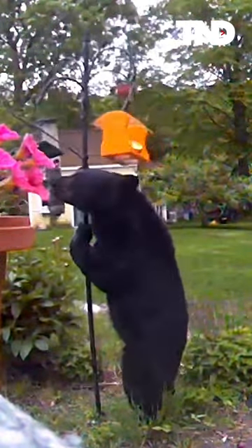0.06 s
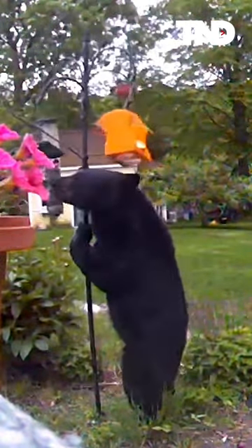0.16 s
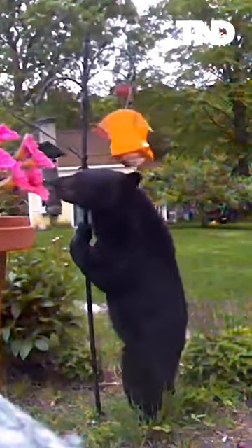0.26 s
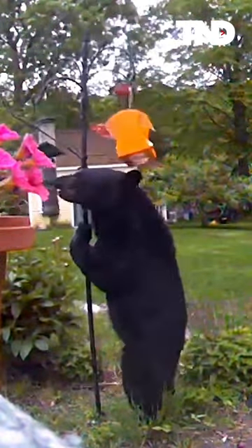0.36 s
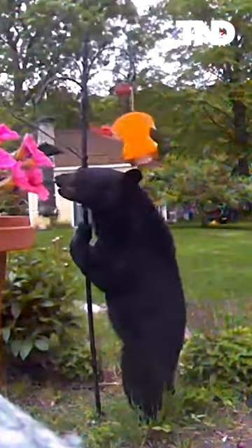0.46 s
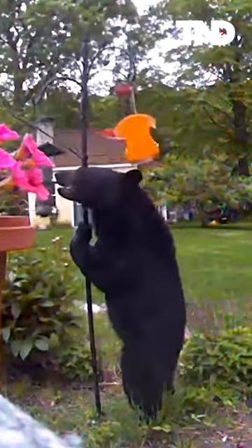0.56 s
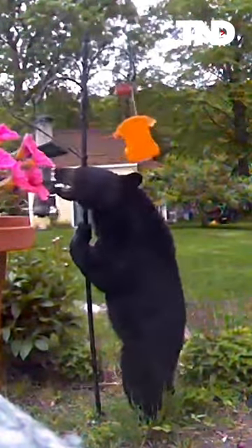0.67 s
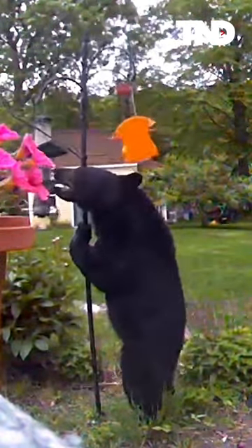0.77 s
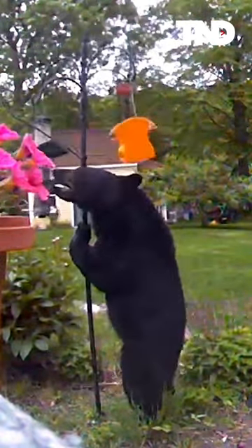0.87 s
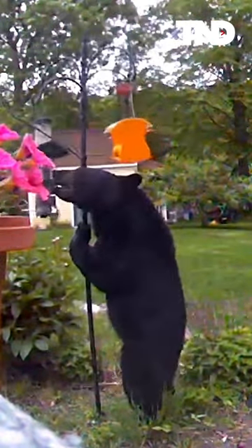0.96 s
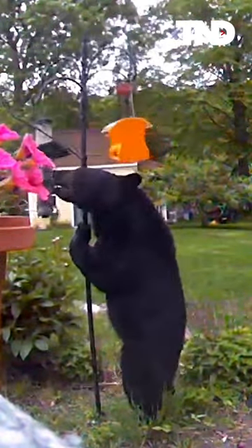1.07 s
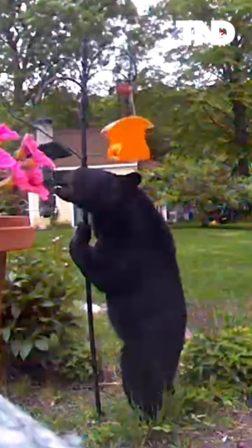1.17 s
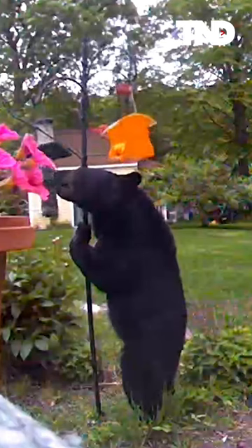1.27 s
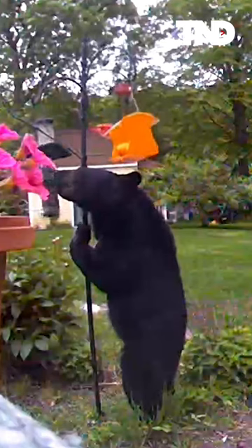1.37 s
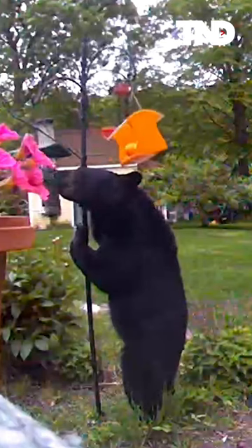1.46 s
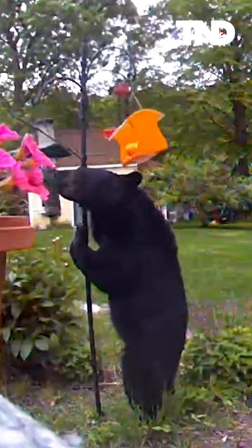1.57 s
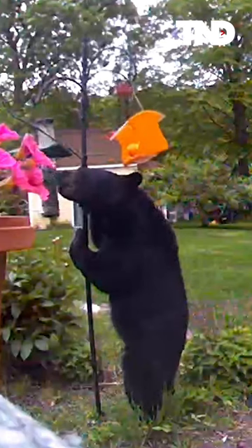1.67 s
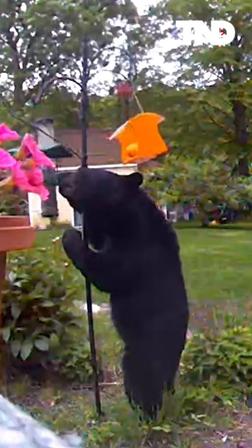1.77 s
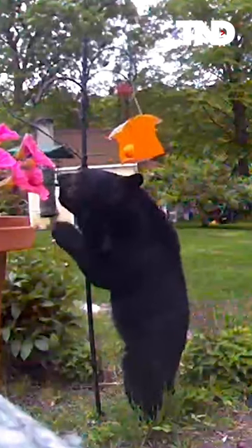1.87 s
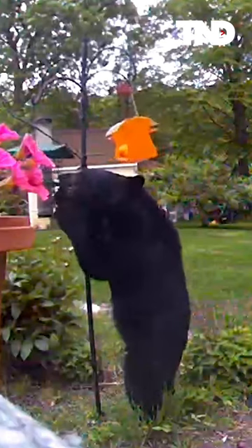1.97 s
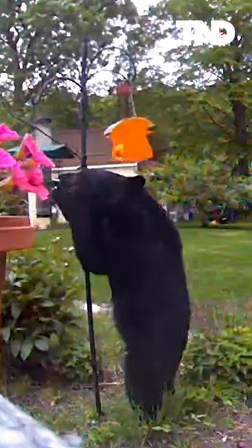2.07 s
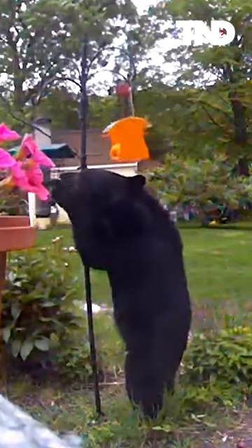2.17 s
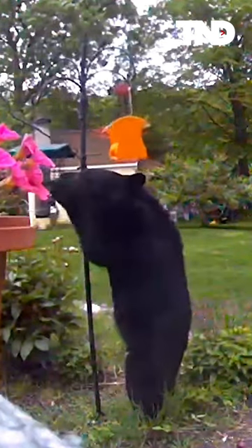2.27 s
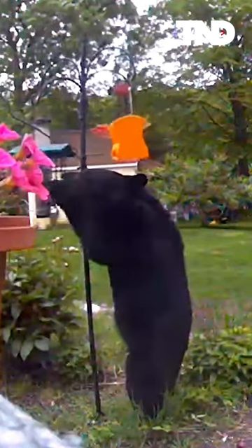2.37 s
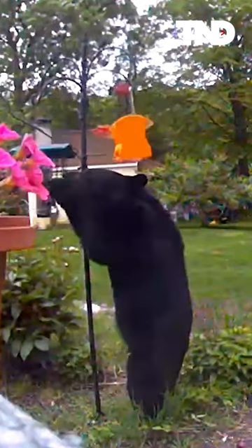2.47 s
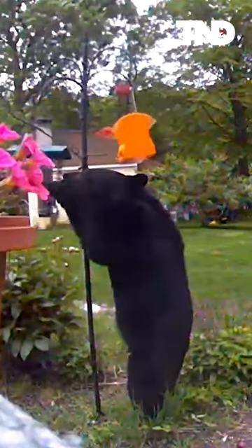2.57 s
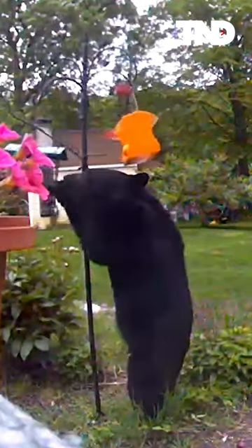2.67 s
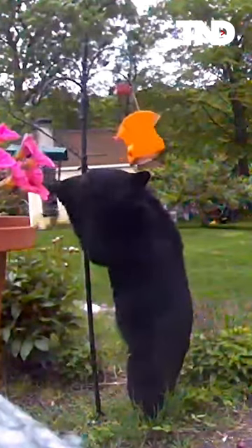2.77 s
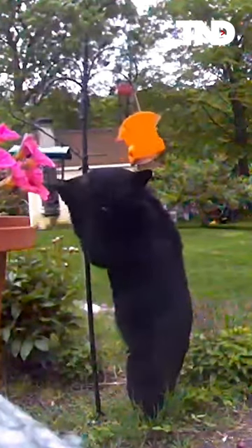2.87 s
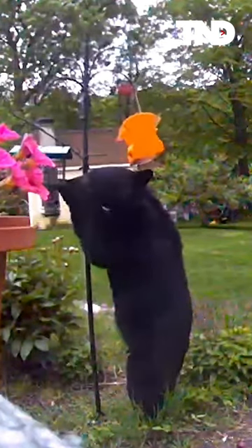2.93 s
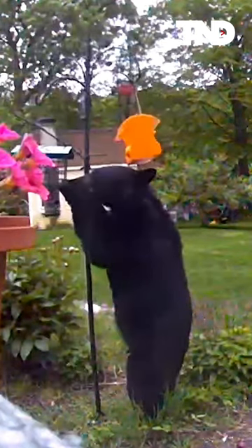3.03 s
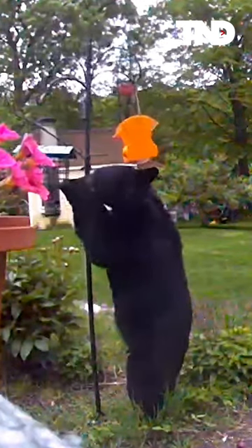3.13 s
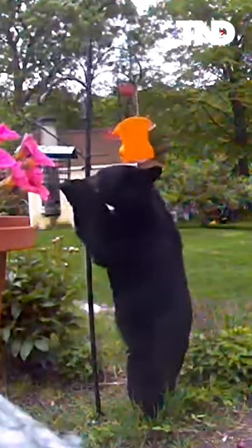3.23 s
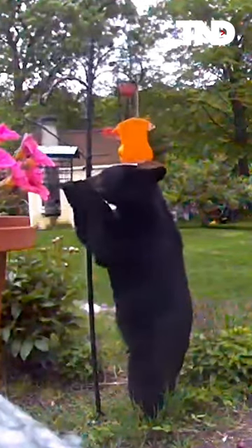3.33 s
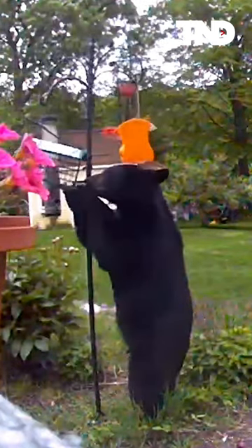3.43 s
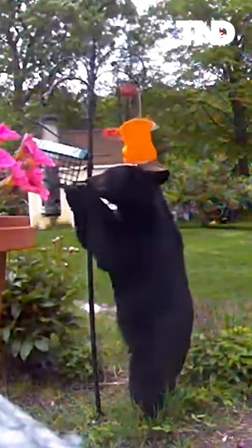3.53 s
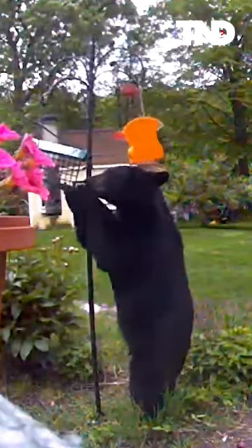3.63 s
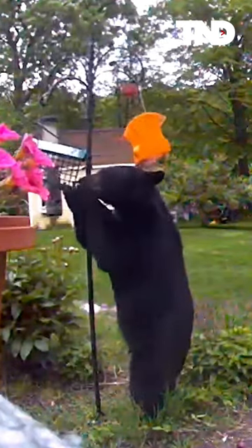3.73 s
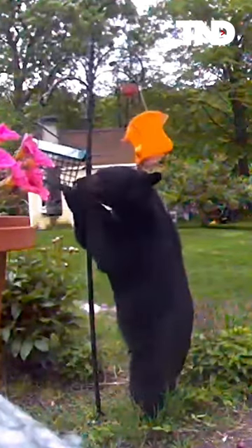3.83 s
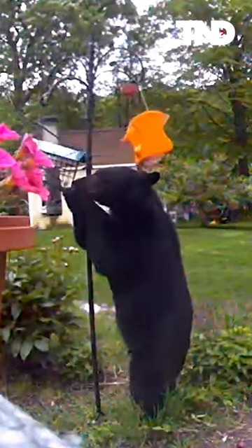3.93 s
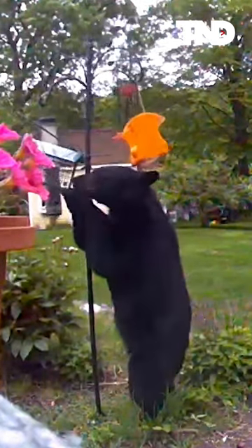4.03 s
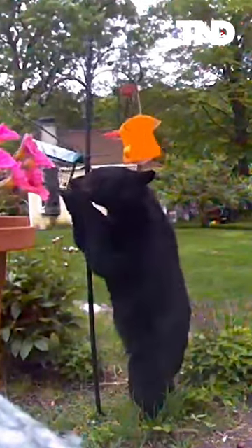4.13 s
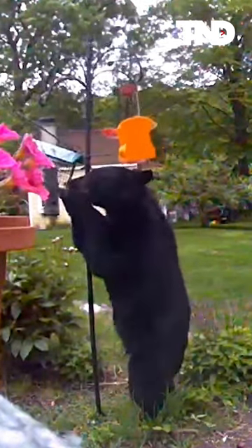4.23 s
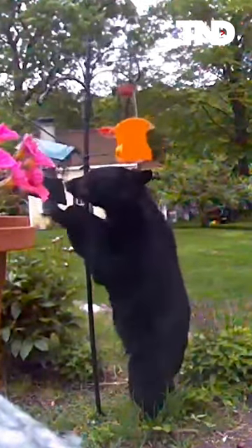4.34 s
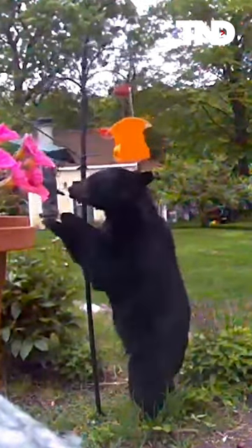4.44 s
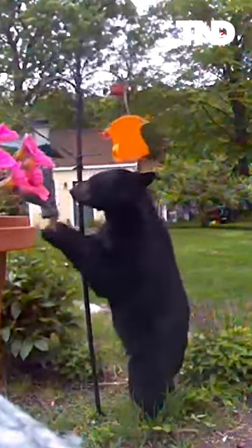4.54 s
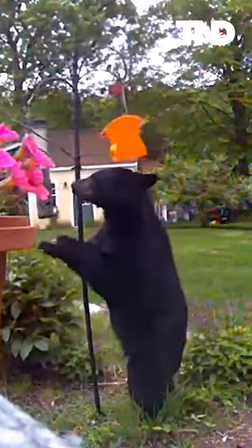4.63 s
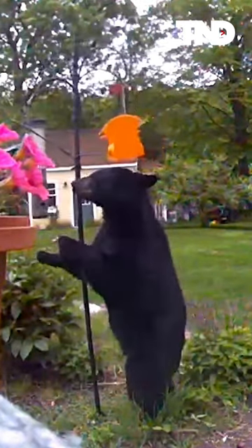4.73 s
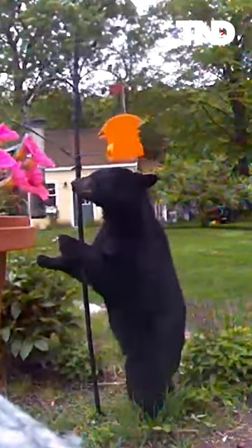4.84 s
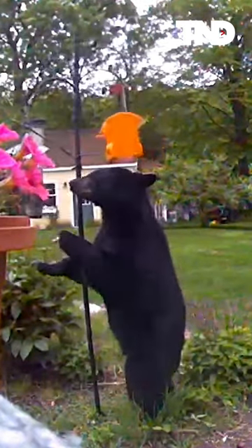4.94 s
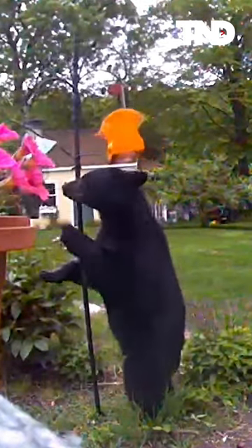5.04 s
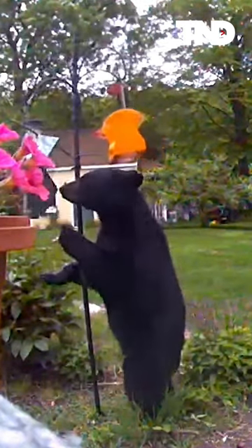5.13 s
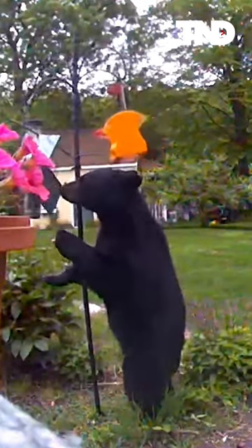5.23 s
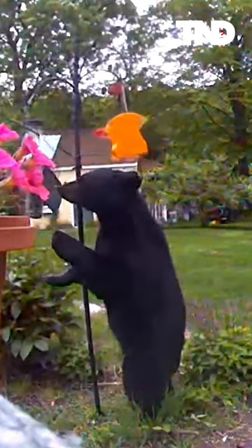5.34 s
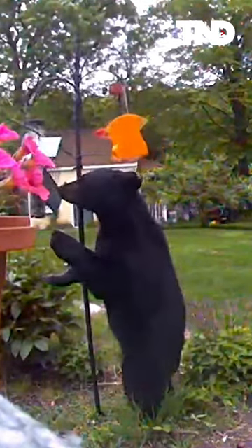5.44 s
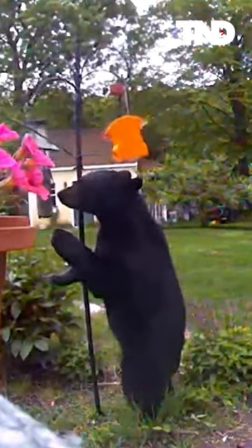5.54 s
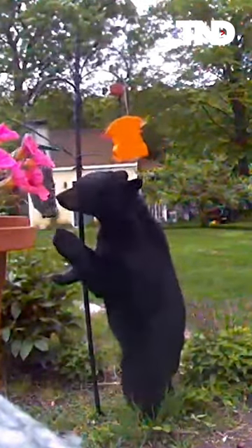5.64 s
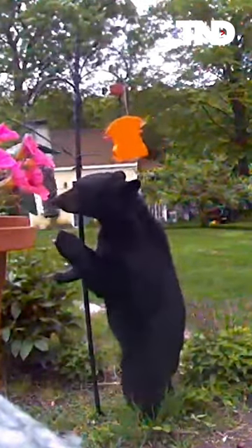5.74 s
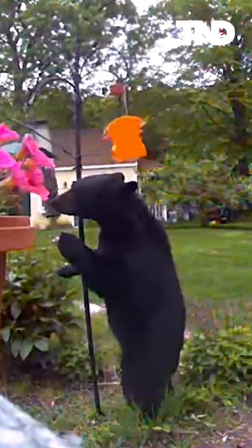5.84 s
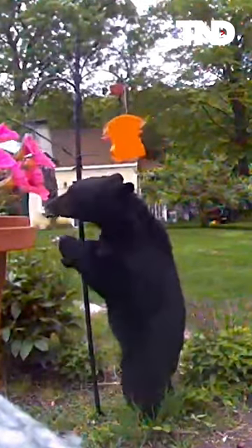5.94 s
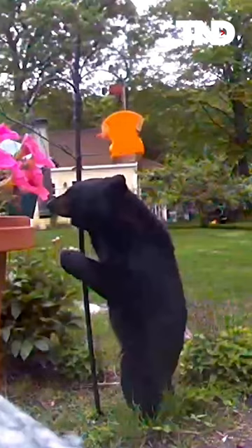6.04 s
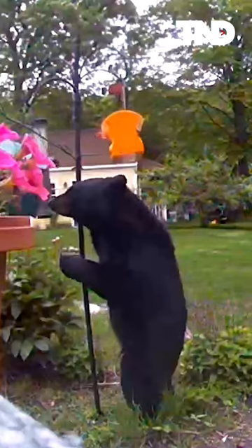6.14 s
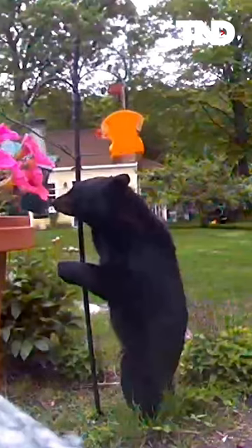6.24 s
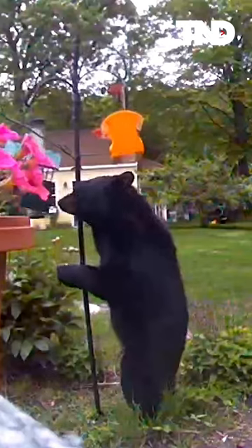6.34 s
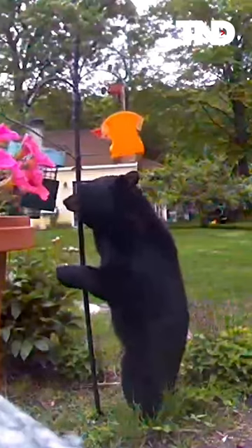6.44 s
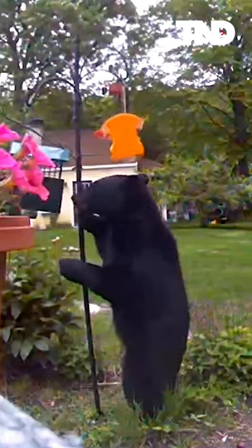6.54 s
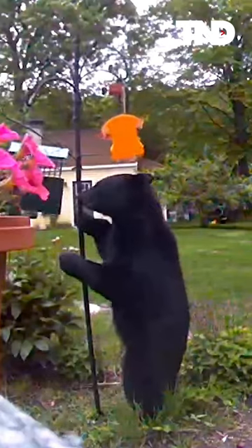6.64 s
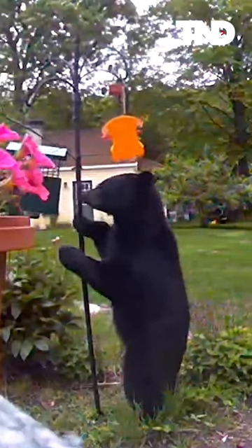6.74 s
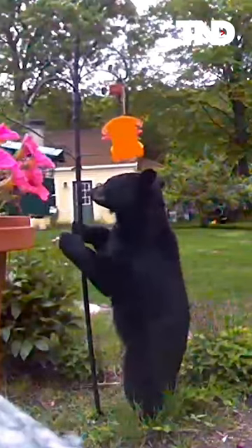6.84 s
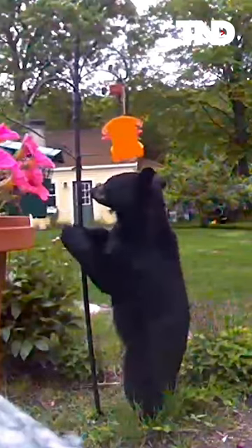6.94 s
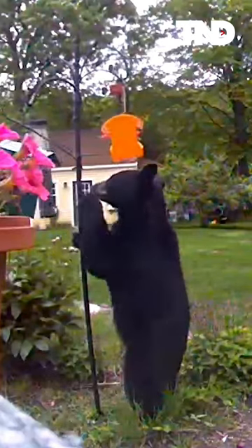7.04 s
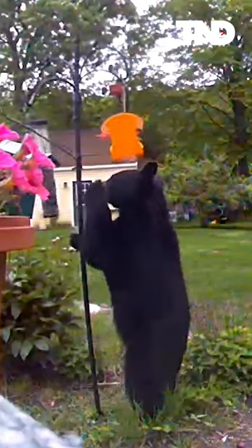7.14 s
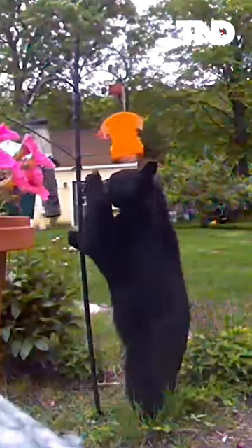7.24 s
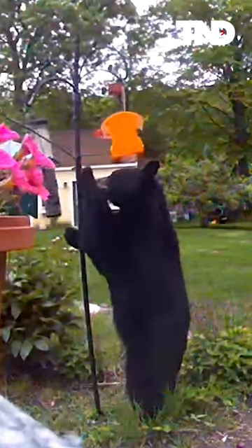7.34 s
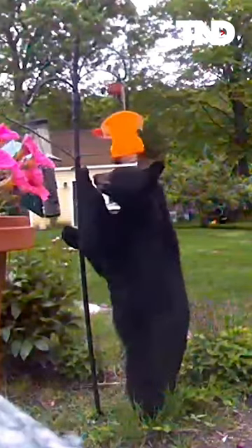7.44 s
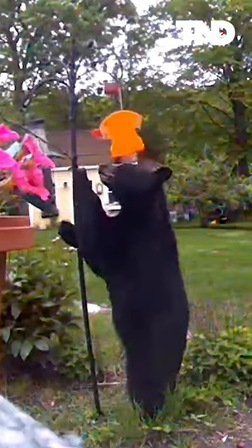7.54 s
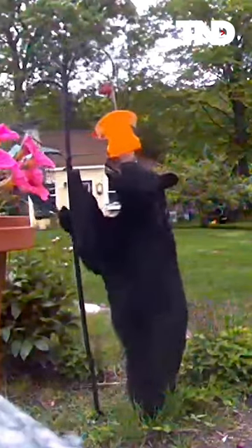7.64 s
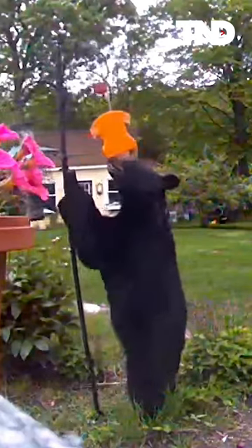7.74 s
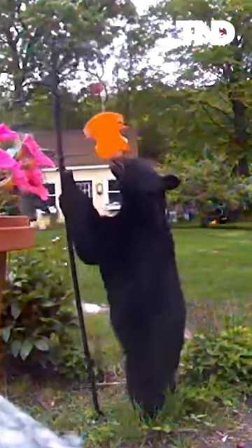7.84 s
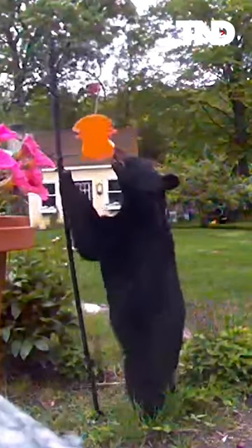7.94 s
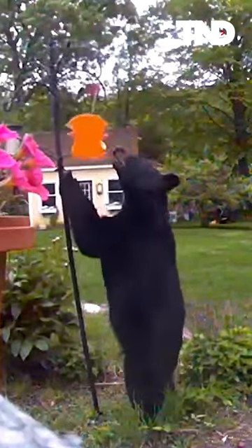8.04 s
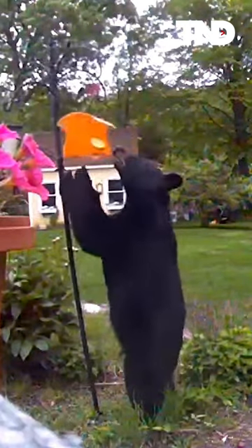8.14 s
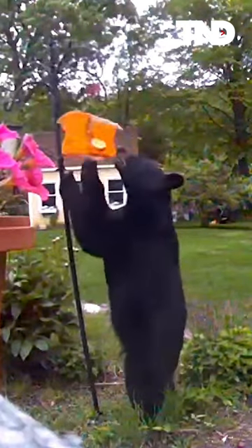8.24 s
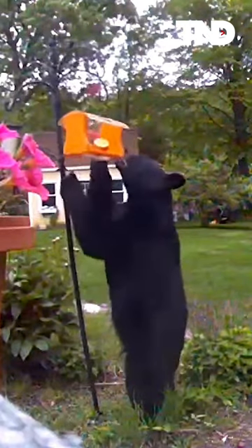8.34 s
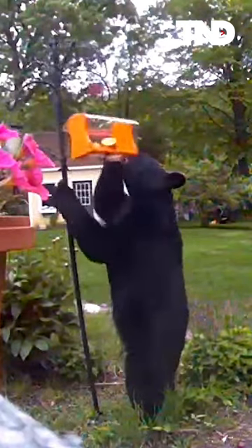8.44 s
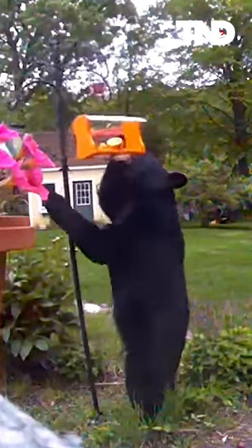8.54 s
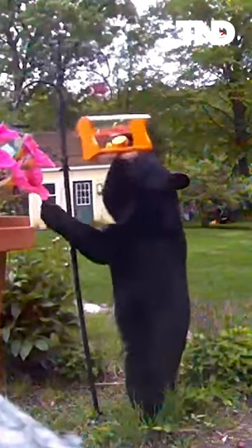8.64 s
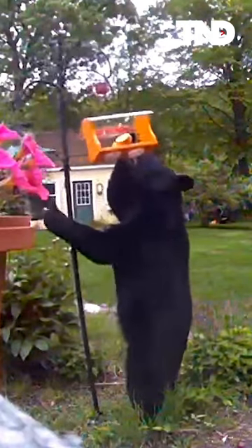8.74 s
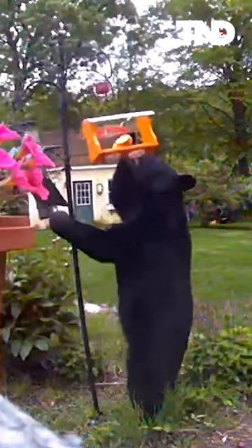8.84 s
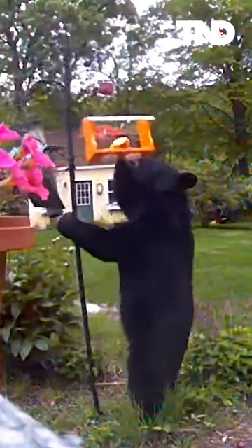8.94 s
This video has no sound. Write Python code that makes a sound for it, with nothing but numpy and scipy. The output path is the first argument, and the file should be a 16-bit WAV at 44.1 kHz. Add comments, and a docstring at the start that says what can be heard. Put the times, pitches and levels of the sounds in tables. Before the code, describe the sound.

Small hollow plastic taps come in uneven clusters, with two tiny metallic pings early on. A light cage rattle leads to a much louder metal clash on the pole, which jangles and dies away. One nearby bird gives rare flat peeps; a more distant one whistles upward with long echoes. A soft shrub brush precedes final hard plastic knocks. Outdoors, close microphone, faint rumble and hiss, short reflections.

```python
"""A quiet backyard, where a bear handles the feeders on a thin metal pole.
Plastic clicks and knocks are noise flurries through a shell's resonances; a wire cage swings and rattles
against the pole, whose thin modes ring on; a small hook pings as decaying tones; fur brushes a shrub as noise.
One bird gives single flat notes, steady sines; another rising whistles, gliding sines that echo off houses.
Distant traffic rumbles, leaves and insects hiss: all coloured noise."""
import sys
import numpy as np
from scipy import signal
from scipy.fft import rfft, irfft, next_fast_len
from scipy.io import wavfile
from scipy.ndimage import uniform_filter1d, map_coordinates

SR = 44100
rng = np.random.default_rng(int(sys.argv[2]) if len(sys.argv) > 2 else 0)


def persist_wave(psi):
    """Save psi, clipped to +-1, as 16-bit WAV."""
    counts = np.round(np.clip(psi, -1, 1) * 32767).astype(np.int16)
    wavfile.write(sys.argv[1], SR, np.atleast_2d(counts).T)


N = 396900

# Course of the yard beds: t/s, engines level/dB, rumble level/dB, traffic level/dB, leaves level/dB
YARD_LEVELS = [(0, -54, -54, -58, -61.5), (1.2, -55, -54.5, -59, -62.5), (3.8, -55, -54, -60.5, -61.5),
               (5.3, -54.5, -55, -61, -61), (6.3, -57, -56, -62, -62.5), (7.2, -59.5, -55.5, -62, -63.5),
               (8.1, -61, -55, -61, -60.5), (9, -60, -54, -60, -62.5)]
# Noise spectra of the beds, relative density: f/Hz, level/dB
RUMBLE_SPECTRUM = [(12, -60), (20, -21.5), (32, 0), (48, -3.5), (58, -2.5), (70, -5.5), (129, -8.5),
                   (161, -12.5), (266, -14), (320, -16.5), (420, -21.5), (700, -120)]
TRAFFIC_SPECTRUM = [(160, -7.5), (280, -8.5), (960, -5.5), (1040, -8.5), (1370, -13), (1600, -15),
                    (2080, -22), (3520, -120)]
LEAVES_SPECTRUM = [(820, -31.5), (1400, -26.5), (1590, -28), (1790, -13), (1840, -8), (2350, -6),
                   (2720, -7), (3750, -7.5), (4080, -7), (4870, -3.5), (5460, -8), (7470, -11.5),
                   (8700, -22.5), (11300, -68), (19100, -120)]
# Far engines, narrow and fuzzy: f/Hz, width/Hz of each resonance pass, level/dB against the engines level
ENGINE_HUMS = [(42.3, 15, -1), (134.5, 22, -10)]
# Insects, one band: f/Hz, width/Hz of each resonance pass, mean rms level/dB
INSECT_BAND = (4660, 550, -70.5)
# Contacts on plastic: t/s, crack level/dB, then against the crack: thud level/dB, knock level/dB, tick level/dB;
# t60/s of the flurry, ring f/Hz, ring level/dB against the crack
PLASTIC_CONTACTS = [(0.261, -43.5, -29, -6.5, -0.5, .045, 640, -3),
                    (0.495, -43.5, -8, -1, 2, 0.058, 5740, 4), (0.75, -46.5, -16, -5, -25, 0.083, 1560, -3),
                    (0.799, -44.5, -4.5, -7, -1, 0.18, 767, -3), (0.833, -50, -5, 0, -27, 0.21, 1516, -4),
                    (1.002, -39, -9.5, -7, -1, 0.092, 3140, -10),
                    (1.182, -54, -15, -6, -2, .18, 3760, -0.5), (1.561, -57, -0.5, -3, 1, 0.14, 3400, 8),
                    (1.803, -51, -12, 4, -14, 0.14, 3280, 3.5), (1.852, -60.5, -11, 5, -12, 0.047, 1570, 2),
                    (1.874, -51.5, -4, -6, -13, .13, 1520, -3), (1.907, -55.5, 2.5, 1, -1, 0.31, 3740, -2),
                    (1.937, -55.5, -3, -5, -1.5, 0.35, 3330, 1),
                    (2.045, -45.5, -6, -17, -23, 0.054, 1570, -4),
                    (2.093, -38.5, -14, -14, -21, 0.026, 1480, -9.5),
                    (2.115, -62, -5, 3, -10, .14, 1500, 8), (2.214, -56.5, -16, -2, -1, 0.068, 720, 9),
                    (2.269, -57, -5, -3, -1, 0.088, 5260, -2), (2.511, -60, -1, -7, 2, 0.1, 2540, -1),
                    (2.685, -59.5, 1, 1, 2.5, 0.17, 2830, 2.5), (2.964, -60, -8, -6, 0, .07, 6000, 2.5),
                    (3.107, -51, -9, -7, 5.5, 0.19, 2870, -2), (3.377, -60, -18, -10, 8.5, 0.13, 3510, 7.5),
                    (3.702, -48, -30, -5, -4, 0.073, 823, -1), (3.894, -56.5, 4, 2, -15, .086, 1630, -1),
                    (3.917, -51, 1, -11, -22, 0.15, 1635, 0), (4.827, -43, -26, -25, -23, 0.031, 850, -6),
                    (5.266, -57.5, -5, -5, -9, 0.14, 970, 0.5), (5.376, -61, -10, -9.5, 6, 0.053, 643, -9),
                    (6.224, -60, 2, -19, 4, 0.14, 5750, -1.5),
                    (7.649, -64.5, 12.5, -6.5, -5, 0.14, 630, -9),
                    (7.862, -39.5, -10, -8.5, -16, .035, 4700, -4),
                    (8.132, -30, -15, -1, -10.5, 0.093, 950, 3),
                    (8.149, -47.5, 11.5, 11.5, -13, 0.084, 1158, 13),
                    (8.263, -59.5, 6, 7.5, -1, .16, 2000, 1),
                    (8.298, -48.5, -11, 5.5, 3.5, 0.095, 1280, -9),
                    (8.311, -43.5, -4.5, 0, -2, .06, 846, -5.5), (8.345, -59, 14, 2, -12, 0.2, 261, 12.5),
                    (8.653, -30.5, -11, -21, -17.5, 0.06, 1554, -9),
                    (8.898, -36, -12, -5, 0.5, 0.12, 3680, 7),
                    (8.909, -39.5, -13, -5.5, -5.5, 0.22, 5560, 5.5)]
# Contacts of the cage with the pole: the same columns
CAGE_CONTACTS = [(3.456, -41.5, 0, -1.5, 2, 0.33, 6427, -2), (3.483, -36.5, -3.5, -0.5, 0, 0.22, 6167, 1),
                 (3.523, -38.5, -1, -0.5, -18, .15, 2825, -10), (3.549, -55.5, 8, 2, -9, 0.43, 334, 5.5),
                 (3.575, -60, 2, 1, -5, 0.21, 1470, 8.5), (4.356, -49, -13, 5.5, 7, 0.55, 6167, -3),
                 (4.369, -22, -7.5, -4, -1.5, 0.55, 334, -12), (4.396, -30, 2, 3.5, -2, .08, 862, -1),
                 (4.407, -23.5, -7, -2.5, 3, 0.2, 4054, 11), (4.425, -20, -15, -23, 1, 0.096, 2562, -6),
                 (4.453, -18.5, -19, -9.5, -13, 0.17, 1600, -15), (4.487, -41, 3, 8, -16.5, .27, 1600, 8.5),
                 (4.527, -30.5, -26, -11, 0.5, .17, 3600, -2.5),
                 (4.597, -38.5, -13, -10, -2, 0.2, 4054, -16),
                 (4.641, -47.5, -3.5, -5, -4.5, 0.8, 862, -18),
                 (4.698, -38, -7.5, -7.5, -0.5, 0.32, 862, 3.5), (4.787, -53, 3, 2, -8, 0.53, 862, -4),
                 (4.887, -48.5, -8, -5, -4.5, 0.19, 3600, -15),
                 (4.971, -53, -26, -0.5, -5.5, 0.39, 862, -0.5)]
# Bands of a blow, in order thud, knock, crack, tick, edge: low f/Hz, high f/Hz
BLOW_BANDS = [(70, 700), (700, 2000), (2450, 4900), (4900, 7000), (7000, 9000)]
# Resonances of the plastic shell: f/Hz, width/Hz, level/dB
SHELL_MODES = [(452, 210, -4.5), (955, 200, -27), (1170, 420, -2), (1600, 190, -10.5), (2980, 910, 2.5),
               (3470, 380, 9), (3760, 500, 8), (4350, 400, 3.5), (5680, 450, 0), (6440, 370, 0)]
# Broad buzz of the cage wires: f/Hz, width/Hz, level/dB
WIRE_MODES = [(600, 390, 0.5), (982, 350, 5.5), (1630, 890, -7), (2524, 850, 1), (3380, 590, 6),
              (3980, 840, 0), (5960, 790, 6), (6930, 600, -3.5), (8530, 500, -19)]
# Thin modes of the metal pole: f/Hz, level/dB, t60/s
POLE_MODES = [(236, 3, .12), (334, 8, .55), (862, 12, .22), (1075, 8, .2), (1470, 4, .3), (1600, 9, .15),
              (2384, 8, .15), (2562, 14, .15), (2825, 9, .2), (3600, 9, .15), (3950, 11, .15),
              (4054, 15, .2), (5708, 9, .12), (5942, 7, .12), (6167, 9, .12), (6427, 8, .12)]
# Rings of the small metal hook: t/s, f/Hz, initial level/dB
HOOK_PINGS = [(1.006, 3700, -51.5), (1.268, 3680, -55.5)]
# Flat bird notes: t/s, length/s, f/Hz, level/dB at the end
FLAT_NOTES = [(2.48, 0.053, 2580, -60), (5.248, 0.059, 2547, -57), (8.5, 0.05, 2580, -53.5)]
# Rising whistles: t/s at the top, climb length/s, top f/Hz, level/dB before the top accent
RISING_WHISTLES = [(6.536, .1, 3050, -71), (7.072, 0.13, 3060, -58), (7.604, 0.17, 2970, -57)]
# Fur on the shrub: f/Hz, width/Hz of each resonance pass, level/dB at the height of the swell
RUSTLE_BANDS = [(5900, 2600, -65), (2820, 2400, -64.5), (347, 560, -55.5)]

EDGE_DB = -10  # the top band against the tick
PING_T60_S, PING_ATTACK_S = 0.26, 0.002
NOTE_SWELL_DB, NOTE_ATTACK_S, NOTE_RELEASE_S = 3.5, 0.011, 0.015  # the times are for 20 dB
# The climb steepens towards the knee (Hz per root second), then flicks up to the top
KNEE_HZ, CLIMB_HZ, FLICK_S = 2780, 2940, 0.0054
# Attack and release are for 20 dB
RISE_ATTACK_S, ACCENT_DB, TOP_HOLD_S, TOP_RELEASE_S = 0.078, 1.3, 0.017, 0.025
# Height of the rustle, and how wide it swells and fades
RUSTLE_S, RUSTLE_RISE_S, RUSTLE_FALL_S = 6.76, 0.19, 0.21
TOP_HZ = 8856  # band limit


def amp(db):
    """A level in decibels is twenty times the logarithm of the amplitude ratio."""
    return 10 ** (np.asarray(db) / 20)


def unit(x):
    """Division by the root mean square gives a signal of rms 1."""
    return x / np.sqrt(np.mean(x ** 2) + 1e-20)


def along(points, hz):
    """Levels between (f/Hz, value) points are interpolated on a logarithmic frequency axis."""
    f, v = np.transpose(points)
    return np.interp(np.log(hz + 1), np.log(f + 1), v)


def wobble(rate):
    """A spline through random knots, `rate` per second, fluctuates smoothly."""
    knots = rng.standard_normal(int(N * rate / SR) + 4)
    return map_coordinates(knots, [np.arange(N) * rate / SR])


def filtered(x, response):
    """Linear filtering multiplies the spectrum by a response, a function of frequency."""
    m = 2 * next_fast_len(x.shape[-1] // 2 + SR // 4)
    return irfft(rfft(x, m) * response(np.fft.rfftfreq(m, 1 / SR)), m)[..., :x.shape[-1]]


def resonance(f, hz, width_hz):
    """A damped oscillator responds causally, with gain 1 at its centre."""
    return 1j * f * width_hz / (hz * hz - f * f + 1j * f * width_hz)


def hum(hz, width_hz, db):
    """Noise passed twice through one resonance becomes a fuzzy band."""
    noise = rng.standard_normal(N)
    return amp(db) * unit(filtered(noise, lambda f: resonance(f, hz, width_hz) ** 2))


def rush(spectrum, patchy_db):
    """Noise with random gain over patches of time and frequency, then coloured, has rms 1."""
    z = signal.stft(rng.standard_normal(N + 512), nperseg=512)[2]
    across_frequency = uniform_filter1d(rng.standard_normal(z.shape), 5, 0)
    patches = uniform_filter1d(across_frequency, 10, 1)
    noise = signal.istft(z * amp(patchy_db * unit(patches)), nperseg=512)[1][:N]
    return unit(filtered(noise, lambda hz: amp(along(spectrum, hz))))


def yard():
    """Independent sources superpose: engines, three drifting noise beds and insects."""
    s, *levels = np.transpose(YARD_LEVELS)
    engines_db, rumble_db, traffic_db, leaves_db = (np.interp(np.arange(N) / SR, s, c) for c in levels)
    engines = amp(engines_db) * sum(hum(*row) for row in ENGINE_HUMS)
    rumble = amp(rumble_db + 1.3 * wobble(4)) * rush(RUMBLE_SPECTRUM, patchy_db=1.5)
    traffic = amp(traffic_db + 0.32 * wobble(14)) * rush(TRAFFIC_SPECTRUM, patchy_db=1.1)
    leaves = amp(leaves_db + 1.4 * wobble(3.0)) * rush(LEAVES_SPECTRUM, patchy_db=2.76)
    insects = amp(1.5 * wobble(7.7)) * hum(*INSECT_BAND)
    return engines + rumble + traffic + leaves + insects


def width(t60):
    """The width in Hz of a mode is inversely proportional to its decay time."""
    return np.log(1000) / (np.pi * max(t60, .01))


def causal(gain):
    """Folding the cepstrum of a gain forward in time yields its minimum-phase response."""
    cepstrum = irfft(np.log(gain + 1e-6))
    half = len(cepstrum) // 2
    cepstrum[1:half] *= 2
    cepstrum[half + 1:] = 0
    return np.exp(rfft(cepstrum))


def loudest(x):
    """The short-time rms is taken over 400 samples, and its maximum is the peak level."""
    return np.sqrt(uniform_filter1d(x * x, size=400).max())


def jolts(t, t60, rise, spiky_db, quicker, snap):
    """Impact: a first snap, then a dying flurry of uneven contacts, a strand per band; treble dies quicker."""
    sizes = amp(spiky_db * rng.standard_normal(len(t) // 64 + 1)).repeat(64)[:len(t)]
    lives = max(t60, .005) * quicker ** np.arange(len(BLOW_BANDS))[:, None]
    onset = 1 - np.exp(-t / max(rise, 5e-5))
    decay = amp(-60 * t / lives) + snap * np.exp(-t / 0.0005)
    return sizes * onset * decay * rng.standard_normal((len(BLOW_BANDS), len(t)))


def coloured(strands, band_db):
    """Band filtering separates the strands of a blow, and each is set to its own peak level."""
    out = 0
    for edges, strand, db in zip(BLOW_BANDS, strands, band_db):
        band = signal.sosfilt(signal.butter(3, edges, "band", fs=SR, output="sos"), strand)
        out = out + amp(db) * band / loudest(band)
    return out


def blows(table, modes, flat, scatter_db, spiky_db, quicker, snap, rise, ring_t60, shortens, size):
    """Modal excitation: contacts drive one body with mode strengths drawn anew; higher rings die sooner."""
    out, t, f = np.zeros(N + SR), np.arange(size) / SR, np.fft.rfftfreq(size, 1 / SR)
    powers = np.array([abs(amp(db) * resonance(f, hz, w)) ** 2 for hz, w, db in modes])
    through = lambda x, response: irfft(rfft(x) * response, size)
    fade = np.clip(5 - 5 * t / t[-1], 0, 1)  # over the last fifth
    for s, db, thud_db, knock_db, tick_db, t60, ring_hz, ring_db in table:
        blow = jolts(t, t60, rise, spiky_db, quicker, snap)
        strengths = amp(2 * rng.normal(0, scatter_db, len(modes)))
        body = causal(np.sqrt(flat ** 2 + strengths @ powers))
        bands = coloured(through(blow, body), [thud_db, knock_db, 0, tick_db, tick_db + EDGE_DB])
        # the spot that is hit sings on
        life = ring_t60 * (1000 / ring_hz) ** shortens
        ring = through(blow[1] * np.exp(-t / 0.058), resonance(f, ring_hz, width(life)))
        sound = bands + amp(ring_db) * ring / loudest(ring)
        out[round(s * SR):][:size] += amp(db) * fade * sound
    return out[:N]


def feeder():
    """Forced resonance: each contact cracks through the plastic shell's modes."""
    return blows(PLASTIC_CONTACTS, SHELL_MODES, flat=0.28, scatter_db=7, spiky_db=1.5, quicker=0.9, snap=1.4,
                 rise=0.0007, ring_t60=0.049, shortens=0.65, size=8192)


def yard_echo(x, t60, gap):
    """Diffuse reflection from walls and trees: decaying noise of energy 1 after a gap in seconds."""
    t = np.arange(SR) / SR
    tail = rng.standard_normal(SR) * amp(-60 * t / t60) * (t > gap)
    return signal.fftconvolve(x, tail / np.linalg.norm(tail))[:N]


def tone(hz, db):
    """A sine accumulates phase at its frequency; pitch and rms level may vary by the sample."""
    return np.sqrt(2) * amp(db) * np.sin(2 * np.pi * np.cumsum(hz * np.ones(N)) / SR)


def pings():
    """Free vibration: each ring of the hook starts at once and decays exponentially."""
    out = np.zeros(N)
    for s, hz, db in HOOK_PINGS:
        age = np.clip(np.arange(N) / SR - s, 0, 9)
        out += (1 - np.exp(-age / PING_ATTACK_S)) * tone(hz, db - 60 * age / PING_T60_S)
    return out


def slope(late, seconds):
    """A linear fall in level, 20 dB per so many seconds once late exceeds 0, is an exponential in amplitude."""
    return -20 * np.clip(late, 0, 1) / max(seconds, .002)


def notes():
    """Tones of constant frequency swell a little and stop."""
    t, out = np.arange(N) / SR, np.zeros(N)
    for s, length, hz, db in FLAT_NOTES:
        swell = -NOTE_SWELL_DB * np.clip((s + length - t) / length, 0, 1)
        ends = slope(s - t, NOTE_ATTACK_S) + slope(t - s - length, NOTE_RELEASE_S)
        out += tone(hz, db + swell + ends)
    return out


def cage():
    """Coupled bodies: wires chatter in a broad buzz, and the same chatter feeds the pole's thin modes."""
    pole = [(hz, width(t60), db) for hz, db, t60 in POLE_MODES]
    # metal sings only on its own modes
    nearest = lambda hz: min((mode[0] for mode in POLE_MODES), key=lambda m: abs(m - hz))
    rattles = [(*row[:6], nearest(row[6]), row[7]) for row in CAGE_CONTACTS]
    return blows(rattles, WIRE_MODES + pole, flat=0.47, scatter_db=4.0, spiky_db=4.0, quicker=0.94, snap=0.96,
                 rise=0.0041, ring_t60=0.21, shortens=1.12, size=24576)


def rises():
    """Frequency glides: whistles climb, flick up to a louder top note and stop."""
    out = np.zeros(N)
    for s, climb, top_hz, db in RISING_WHISTLES:
        early = s - np.arange(N) / SR
        flick = np.exp(-np.clip(early, 0, 1) / FLICK_S)
        climb_hz = KNEE_HZ - CLIMB_HZ * np.sqrt(np.clip(early, 0, .5))
        hz = (1 - flick) * climb_hz + flick * top_hz
        attack = slope(early - climb + RISE_ATTACK_S / 2, RISE_ATTACK_S)
        release = slope(-early - TOP_HOLD_S, TOP_RELEASE_S)
        out += tone(hz, db + ACCENT_DB * flick ** 2 + attack + release)
    return out


def birds():
    """Direct and reflected sound: the rising whistler is farther off, so its echo is strong and long."""
    near, far = notes(), rises()
    near_echo = amp(-14) * yard_echo(near, t60=0.57, gap=0.023)
    far_echo = amp(1.5) * yard_echo(far, t60=1.26, gap=0.0071)
    return near + near_echo + far + far_echo


def rustle():
    """Friction noise: fur brushing the shrub is slightly grainy, and swells and fades."""
    late = np.arange(N) / SR - RUSTLE_S
    swell = np.exp(-(late / np.where(late < 0, RUSTLE_RISE_S, RUSTLE_FALL_S)) ** 2)
    return swell * amp(2.0 * wobble(60)) * sum(hum(*row) for row in RUSTLE_BANDS)


def scene():
    """Superposition: all sources add, and the contacts and pings have a short echo."""
    knocks = feeder() + cage() + pings()
    echo = amp(-12) * yard_echo(knocks, t60=0.2, gap=0.012)
    return (knocks + echo + birds() + rustle() + yard())[None]


def record(dry):
    """Saturation rounds the loudest peaks; both spectrum ends roll off, with a band limit, over a faint hiss."""
    rounded = dry[0] / (1 + abs(dry[0] / .7) ** 4) ** (1 / 4)

    def roll_off(hz):
        treble = amp(-20 * np.clip((hz - 8000) / 850, 0, 3) ** 1.36) * (hz < TOP_HZ)
        return treble / (1 + (30 / (hz + 1)) ** 4)

    hiss = filtered(rng.standard_normal(N), lambda hz: amp(-97) * (hz < 12750))
    return (filtered(rounded, roll_off) + hiss)[None]


dry = scene()
out = record(dry)
persist_wave(out)
```